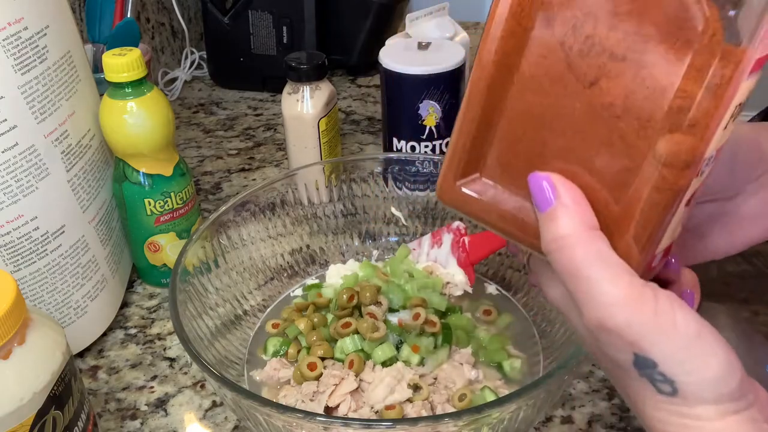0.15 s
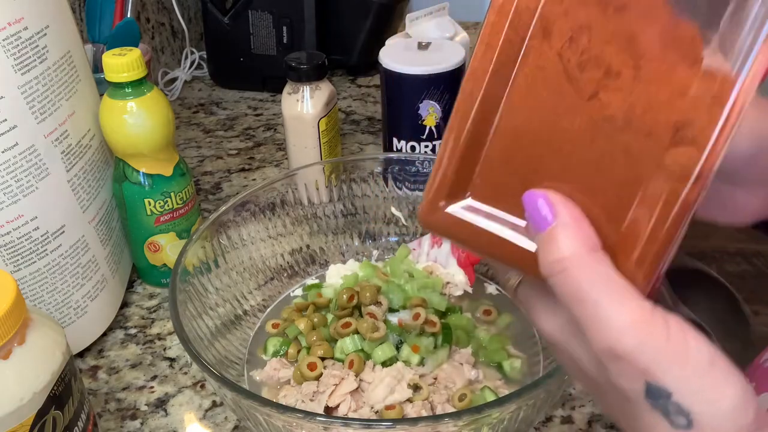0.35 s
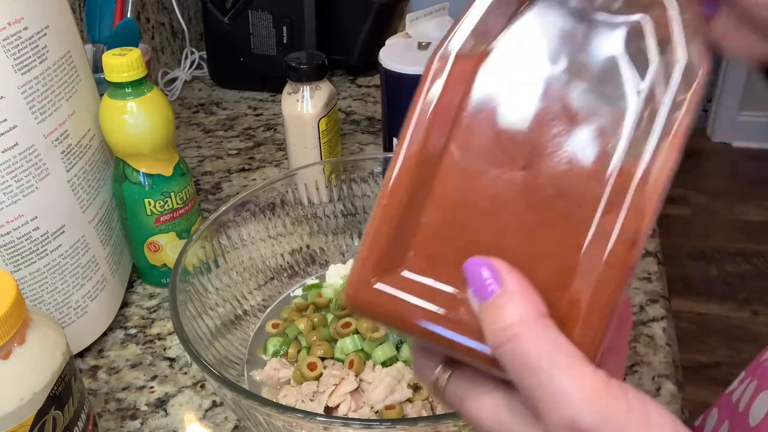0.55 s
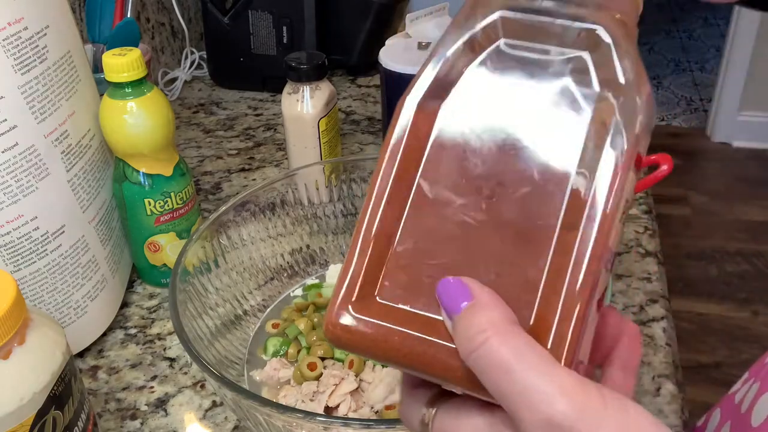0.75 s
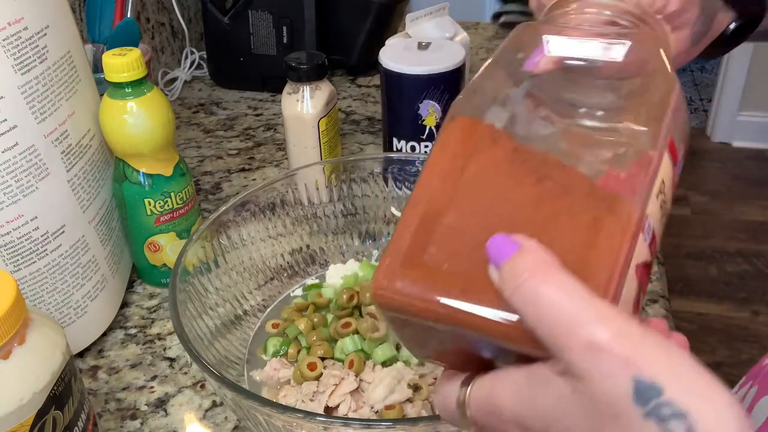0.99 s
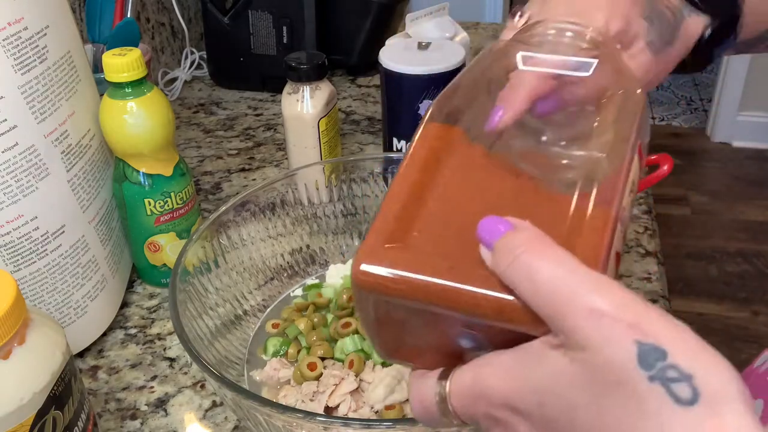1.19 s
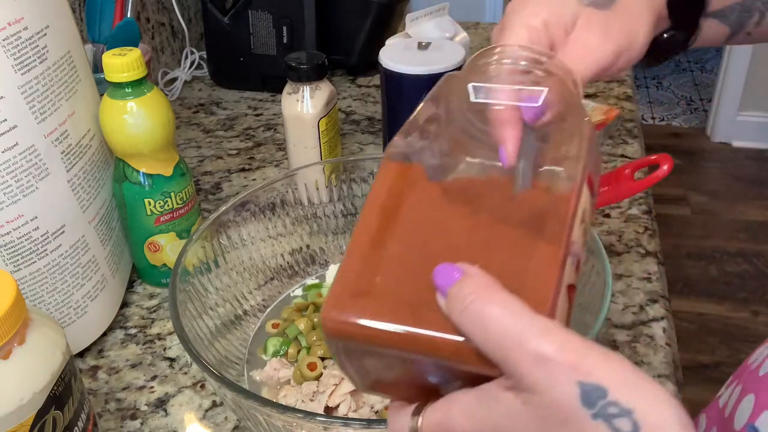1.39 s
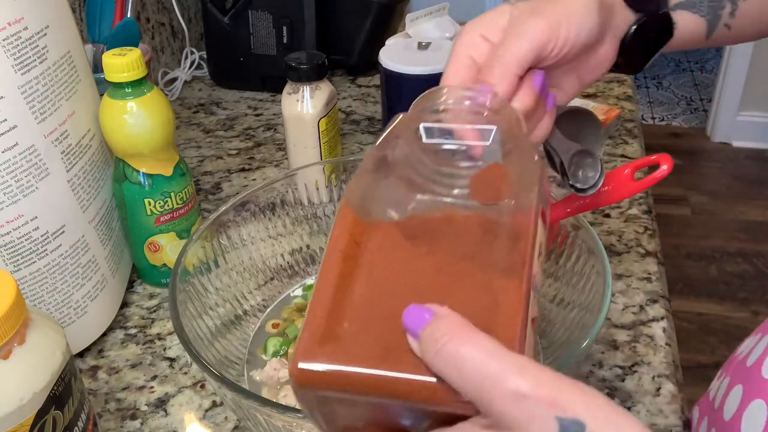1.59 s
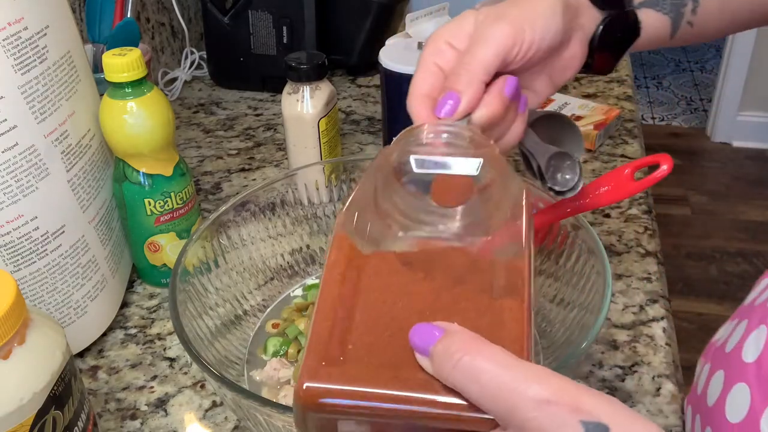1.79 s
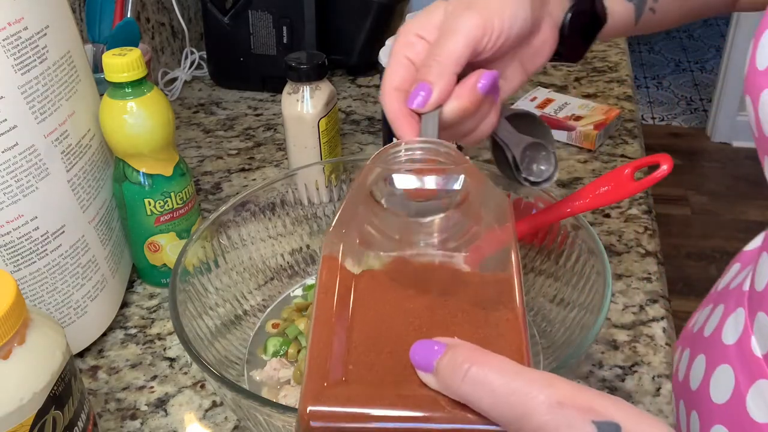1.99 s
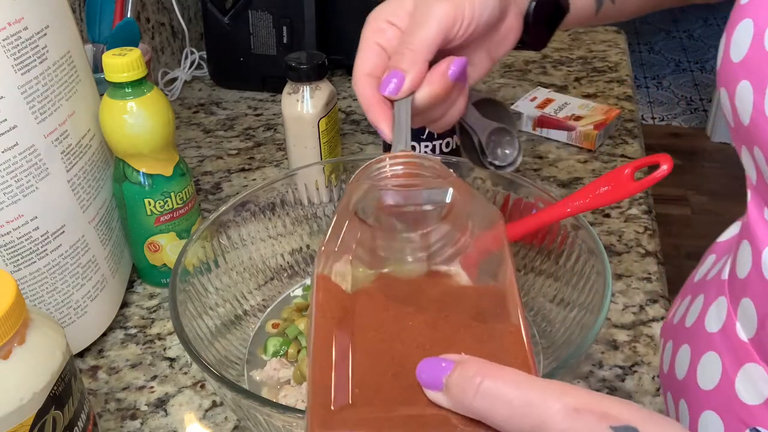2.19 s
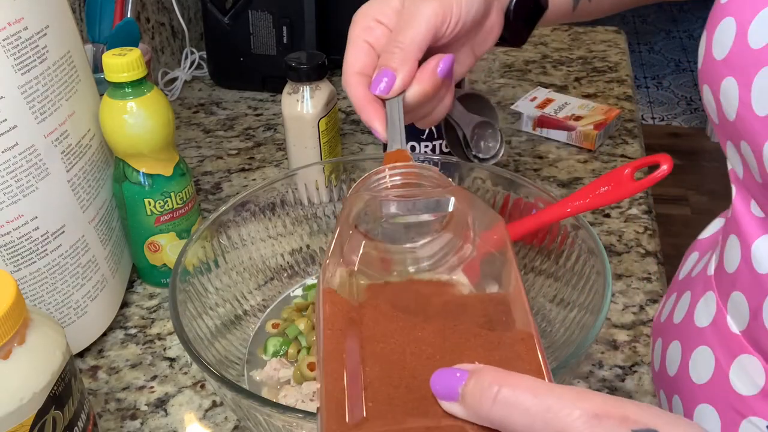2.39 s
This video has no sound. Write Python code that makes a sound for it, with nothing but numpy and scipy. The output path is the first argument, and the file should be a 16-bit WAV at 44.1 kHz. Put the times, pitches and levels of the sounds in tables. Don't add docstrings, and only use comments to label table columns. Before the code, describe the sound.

Quick, high metal clinks of measuring spoons come first; much quieter taps, light scraping and grainy digging in a plastic spice jar follow. Close phone pickup in a small kitchen with low machine hum behind.

```python
import sys
import numpy as np
from scipy import signal
from scipy.fft import rfft, irfft
from scipy.io import wavfile
from scipy.ndimage import uniform_filter1d

SR = 44100
rng = np.random.default_rng(int(sys.argv[2]) if len(sys.argv) > 2 else 0)


def output_pcm(signal):
    pcm = np.clip(np.atleast_2d(signal).T, -1, 1) * 32767
    wavfile.write(sys.argv[1], SR, np.round(pcm).astype(np.int16))


def amplitude_ratio(level_db):
    exponent = np.asarray(level_db, float) / 20
    return 10 ** exponent


N = 108045


def curve(table):
    s, db = np.array(table).T
    return np.interp(np.arange(N) / SR, s, db, left=-120, right=-120)


def unit(x):
    return x / np.sqrt(np.mean(x ** 2))


def colour(x, table):
    hz, db = np.array(table, float).T
    f = np.fft.rfftfreq(x.shape[-1], 1 / SR) + 1
    low_cut = 14 * np.log2(np.maximum(hz[0] / f, 1))
    gain = amplitude_ratio(np.interp(np.log(f), np.log(hz), db) - low_cut)
    return irfft(rfft(x) * gain, x.shape[-1])


def focus(table, hz, db_per_octave):
    table = np.array(table, float)
    table[:, 1] -= db_per_octave * np.abs(np.log2(table[:, 0] / hz))
    return table


def grains(per_s, spread_db, size=N):
    size_db = spread_db * np.minimum(rng.exponential(size=size), 3.5)
    happens = rng.random(size) < per_s / SR
    return happens * np.clip(rng.standard_normal(size), -2, 2) * amplitude_ratio(size_db)


def walk(rate):
    k = int(SR / rate)
    steps = np.repeat(rng.standard_normal(N // k + 1), k)
    return unit(uniform_filter1d(uniform_filter1d(steps, k), k)[:N])


def ring(modes, spread_db, size=8192):
    hz, db, t60 = np.array(modes).T[:, :, None]
    level, detune, sign = rng.standard_normal((3, len(modes), 1))
    t = np.arange(size) / SR
    fade = np.exp(-np.log(1000) * t / np.maximum(t60, .005))
    tone = np.sin(2 * np.pi * hz * (1 + 0.0017 * detune) * t) * np.sign(sign)
    return np.sum(amplitude_ratio(db + spread_db * level) * fade * tone, axis=0)


def burst(table, fade_s, size=2048):
    t = np.arange(size) / SR
    return colour(rng.standard_normal(size), table) * np.exp(-t / max(fade_s, .0005))


def strike(body, push):
    return signal.fftconvolve(push, body)


def rub(body, contacts):
    return signal.fftconvolve(contacts, body)[:N]


def add(out, s, x, db):
    i = int(s * SR)
    out[i:i + len(x)] += (amplitude_ratio(db) * x / np.max(np.abs(x)))[:N - i]


# t/s, peak level/dB, loudest region f/Hz, chatter length/s, crack relative level/dB
CLINKS = [(0.13, -56.5, 12600, 0.008, -6), (0.144, -41.5, 11600, .002, 5),
          (0.2016, -26, 7950, 0.00094, -11), (0.21, -29.5, 14000, 0.0055, -7.5),
          (.2145, -27.5, 9500, 0.0059, 4), (0.2265, -35, 12200, 0.0035, -8.5),
          (0.2345, -33, 9400, .003, -8.5), (0.2372, -13.5, 13100, 0.0025, -8),
          (.2388, -19, 10000, 0.0039, -12), (0.2453, -20, 12500, 0.0019, -11.5),
          (0.2503, -22, 7500, 0.0024, -12.5), (0.254, -20, 9610, 0.0027, -16),
          (.2575, -20, 13800, 0.0047, -16), (0.2596, -22, 9540, 0.0017, -14.5),
          (.264, -25, 13400, .003, -14.5), (0.267, -29, 10030, .002, -13.5), (.286, -32, 14800, .004, -8.5),
          (0.292, -29.5, 10500, .004, -8.5), (0.3113, -22.5, 9640, .003, -4),
          (0.3129, -19.5, 9770, 0.0018, -7.5), (.3155, -21.5, 13900, .0015, 0),
          (0.3179, -12.5, 9860, 0.0024, 6.5), (0.3202, -11, 13800, .0015, -5.5),
          (0.326, -16, 9750, .002, -19.5), (0.3338, -20.5, 9750, .002, -16.5),
          (.338, -27.5, 12000, 0.0025, -15), (0.402, -31, 6200, 0.0099, -17),
          (0.4131, -16.5, 9100, .002, -6.5), (0.4142, -22.5, 14300, 0.0024, -5.5),
          (0.4202, -19, 12800, 0.004, 2.5), (0.43, -25, 10900, 0.0041, 2), (0.443, -32, 10600, 0.0025, -4),
          (0.462, -25, 12000, 0.0022, -3), (0.467, -25.5, 12300, 0.0043, -2.5),
          (0.475, -31, 14000, 0.0038, 3), (0.481, -29, 13300, 0.0049, -3), (0.491, -22.5, 11620, .003, -1),
          (0.501, -31, 12100, 0.0062, 1), (0.635, -34.5, 15000, 0.0016, 8.5),
          (0.653, -48.5, 10540, 0.01, 3.5)]
# f/Hz, level/dB, t60/s
SPOON_MODES = [(3430, -10, .025), (4960, -5, .05), (5770, -5, .03), (6620, -12, .04), (8050, -9, .07),
               (8590, -12, .045), (9320, -5, .03), (9470, -4, .035), (9600, -4, .03), (9750, 0, .042),
               (10020, -7, .03), (11660, -9, .03), (12100, -9, .065), (12500, -5, .025)]
# f/Hz, level/dB, t60/s
RING_MODES = [(13430, -3, .035), (13880, -2, .035), (14020, -3, .025), (14800, -8, .03), (15600, -9, .012)]
# f/Hz, level/dB
CRACK = [(500, -32.5), (1500, -21.5), (3200, -6), (5500, -8.5), (9000, -6.5), (13000, -6), (16000, -11)]
# t/s, level/dB
SWING = [(.04, -68), (.13, -65), (.19, -50), (.26, -49.5), (.4, -50.5), (.5, -55.5), (.6, -63), (.7, -69),
         (.88, -75)]


def clinks():
    out, t = np.zeros(N), np.arange(2048) / SR
    modes = np.array(SPOON_MODES + RING_MODES)
    grip_s, grip_damping = .4, .45
    for s, db, hz, length, crack_db in CLINKS:
        rise = 1 - np.exp(-t / (60 * length ** 2))
        chatter = unit(grains(3200, 3, size=2048))
        push = 0.82 * chatter * rise * np.exp(-t / length)
        push[0] = min(3, (.006 / length) ** 2)
        held = [1, 1, grip_damping if s > grip_s else 1]
        steel = ring(focus(modes, hz, 16) * held, 3)
        add(out, s, strike(steel, push), db)
        add(out, s, np.sqrt(rise) * burst(focus(CRACK, hz, 5.0), length), db + crack_db)
    return out


def rattle():
    touches = grains(4000, 1.0)
    modes = np.array(SPOON_MODES + RING_MODES) * [1, 1, .5]
    steel = .5 * unit(rub(ring(modes, 0), touches)) + unit(colour(touches, CRACK))
    hand = amplitude_ratio(-20) * unit(colour(touches, CLICK)) + amplitude_ratio(-11) * unit(colour(touches, GRIT))
    return amplitude_ratio(curve(SWING) + 2.5 * walk(40)) * (steel + hand)


# t/s, peak level/dB, loudest region f/Hz, click relative level/dB, focus/dB per octave
TAPS = [(.166, -35, 1034, 1, 8.5), (.238, -35.5, 1440, -11, 40), (0.3174, -21, 3350, 0, 15),
        (.786, -51, 634, -30, 25), (.933, -33.5, 960, -0.5, 17), (1.093, -41, 3600, 7, 30),
        (1.18, -47, 1510, 6.5, 23), (1.2513, -44.5, 3000, 9.5, 24), (1.257, -49, 4800, 4.5, 4),
        (.9785, -59, 2120, 7, 14), (1.351, -61, 2500, 12.5, 8)]
# f/Hz, level/dB, t60/s
JAR_MODES = [(640, -10, .04), (880, -1, .045), (1020, -4, .03), (1520, -7, .03), (2120, -3, .03),
             (2500, -2, .015), (3400, -4, .012), (5000, -12, .015)]
# f/Hz, level/dB
CLICK = [(500, -48), (2000, 0.5), (4000, -3), (8000, -8), (12000, -9), (16000, -51)]
# t/s, peak level/dB
THUDS = [
    (0.952, -45.5),
    (1.252, -49),
    (1.29, -64),
    (1.834, -46),
    (1.853, -43),
    (2.372, -48.5),
]
# f/Hz, level/dB, t60/s
THUD_MODES = [(250.3, -6, 0.017), (348, -1, 0.026), (571, -9.5, 0.045)]


def jar_knocks():
    out = np.zeros(N)
    for s, db, hz, click_db, focus_db in TAPS:
        add(out, s, strike(ring(focus(JAR_MODES, hz, focus_db), 1.5), np.hanning(7)), db)
        add(out, s, burst(CLICK, .004), db + click_db)
    for s, db in THUDS:
        add(out, s, strike(ring(THUD_MODES, 2.0), np.hanning(60)), db)
    return out


SCRAPE_PER_S = 2300
# t/s, scrape level/dB
PRESS = [
    [(.9, -97), (.95, -64.5), (1.01, -67), (1.035, -62.5), (1.185, -55.5), (1.21, -67.5), (1.27, -57.5),
     (1.42, -73.5), (1.47, -88)],
    [(1.63, -101.5), (1.78, -67.5), (1.92, -76), (2.0, -69), (2.12, -62), (2.17, -67.5), (2.32, -67.5),
     (2.37, -62.5), (2.45, -61)],
]


def jar_scrape():
    slips = grains(SCRAPE_PER_S, 4)
    wall = unit(rub(ring(np.array(JAR_MODES) * [1, 1, .45], 0), slips))
    press = amplitude_ratio(curve(PRESS[0])) + amplitude_ratio(curve(PRESS[1]) - 6.5)
    return amplitude_ratio(-0.5 * walk(35)) * press * wall


# t/s, level/dB, attack/s, decay/dB per s
DIGS = [(0, -58.5, 0.0035, 702), (.87, -61, 0.061, 104), (1.015, -60, 0.031, 41), (1.16, -74.5, 0.013, 103),
        (1.27, -61.5, .01, 112), (1.39, -63, 0.015, 252.5), (1.648, -68, 0.011, 61),
        (1.68, -56.5, 0.0092, 108), (1.76, -65.5, .04, 121.5), (1.93, -60.5, 0.012, 106),
        (1.953, -58.5, 0.0068, 95.5), (2.061, -77.5, 0.041, 18.5), (2.23, -60.5, 0.0049, 90),
        (2.256, -54, 0.0079, 143), (2.331, -86, 0.067, 74), (2.43, -51.5, 0.082, 83)]


def dig_effort():
    t, power = np.arange(N) / SR, 0
    for s, db, attack, decay in DIGS:
        rise = np.clip((t - s) / max(attack, .002), 0, 1)
        power = power + (rise * amplitude_ratio(db - decay * np.maximum(t - s - attack, 0))) ** 2
    return np.sqrt(power)


# f/Hz, level/dB, t60/s
BOWL_MODES = [(2660, 0.5, 0.011), (3520, 3, 0.011), (4330, -10, .012), (5960, 2, 0.012),
              (7560, -14, 0.0068)]


def crumbs():
    return unit(sum(rub(ring([mode], 0), grains(500, 2.5)) for mode in BOWL_MODES))


# f/Hz, level/dB per Hz
POWDER = [(1180, -32.5), (2000, -6), (3810, -2), (6040, -2.5), (8190, -1.5), (12700, -10.5), (13700, -20),
          (16000, -10)]
# f/Hz, level/dB per Hz
SLIDE = [(1800, 0.5), (3000, -7), (5000, -6), (9000, -2), (13000, 1), (16000, -8)]
# f/Hz, level/dB
GRIT = [(400, -27.5), (900, 1), (2300, -3.5), (3000, -13), (6000, -22), (16000, -23.5)]


def powder():
    slide_until_s = 1.5
    t = np.arange(N) / SR
    fine = grains(6000, 2.8, size=(3, N))
    coarse = grains(SCRAPE_PER_S, 1.5, size=(3, N))
    crunch = np.where(t < slide_until_s, unit(colour(fine, SLIDE)), unit(colour(fine, POWDER)))
    crunch[0] += (t > slide_until_s) * amplitude_ratio(-5) * crumbs()
    press = amplitude_ratio(curve(PRESS[0]) - 7.5) + amplitude_ratio(curve(PRESS[1]))
    pushed = dig_effort() * amplitude_ratio(1.1 * walk(60)) * crunch
    return pushed + press * amplitude_ratio(1.6 * walk(50)) * unit(colour(coarse, GRIT))


# f/Hz, width/Hz, level/dB
HUMS = [(50.5, 4.6, -60), (75, 10, -74), (120.8, 9, -61), (154.3, 11, -68), (208.2, 6.3, -70.5),
        (243.2, 4.5, -71), (349, 18, -75.5)]


def machines():
    mains_hz, mains_db = 121.4, -60.5
    f = np.fft.rfftfreq(N, 1 / SR)
    out = amplitude_ratio(mains_db) * np.sqrt(2) * np.sin(2 * np.pi * mains_hz * np.arange(N) / SR)
    for hz, width, db in HUMS:
        band = rfft(rng.standard_normal(N)) / (1 + (2 * (f - hz) / width) ** 2)
        out = out + amplitude_ratio(db) * unit(irfft(band, N))
    return out


# f/Hz, level/dB
AIR = [(20, -14), (45, -5), (125, -13), (400, -25), (950, -33), (1500, -49), (2500, -58), (16000, -60)]


def kitchen():
    air_db, mono_below_hz = -62.5, 205
    f = np.fft.rfftfreq(N, 1 / SR)
    mid, side = colour(rng.standard_normal((2, N)), AIR)
    side = irfft(rfft(side) * f ** 2 / (f ** 2 + mono_below_hz ** 2), N)
    above = irfft(rfft(mid) * (f > 150), N)
    gain = amplitude_ratio(air_db + 0.4 * walk(1.5)) / np.std(above)
    return machines() + gain * np.array([mid + side, mid - side])


def ports(near):
    lag_samples, turn, turn_hz, right_db = 27.3, .27, 550, -.7
    f = np.fft.rfftfreq(N, 1 / SR)
    turns = f * lag_samples / SR + turn * f ** 2 / (f ** 2 + turn_hz ** 2)
    right = -amplitude_ratio(right_db) * irfft(rfft(near) * np.exp(-2j * np.pi * turns), N)
    return np.array([near, right])


def walls(near):
    t60_s, build_s, room_db = .2, 0.01216, -15.5
    t = np.arange(SR // 2) / SR
    tail = rng.standard_normal((2, len(t))) * np.exp(-np.log(1000) * t / t60_s)
    tail = tail * np.minimum(t / build_s, 1)
    tail = tail / np.sqrt(np.sum(tail[0] ** 2))
    return amplitude_ratio(room_db) * signal.fftconvolve(near[None], tail, axes=1)[:, :N]


# f/Hz, level/dB
SCATTER = [(300, 8.5), (2000, 1.5), (3500, 6), (8000, 0.5), (16000, -15)]


def scene():
    crunch = powder()
    near = clinks() + rattle() + jar_knocks() + jar_scrape() + crunch[0]
    return ports(near) + walls(near) + colour(crunch[1:], SCATTER) + kitchen()


def top_cut(x):
    return signal.sosfilt(signal.butter(12, 16650, fs=SR, output="sos"), x)


# f/Hz, level/dB
TOP = [(20, 0), (15780, 0), (15950, -38), (16700, -42), (17000, -80), (22050, -90)]


def record(dry):
    mix = colour(dry, TOP)
    return top_cut(mix)


dry = scene()
out = record(dry)
output_pcm(out)
```